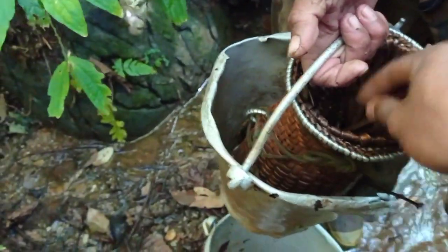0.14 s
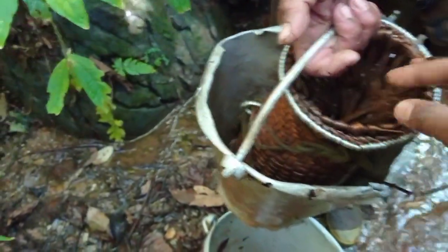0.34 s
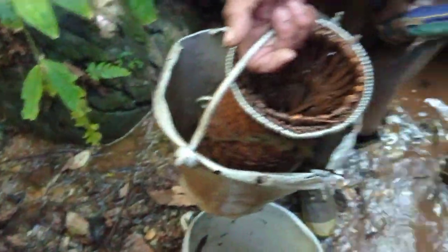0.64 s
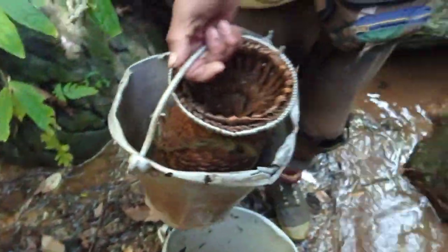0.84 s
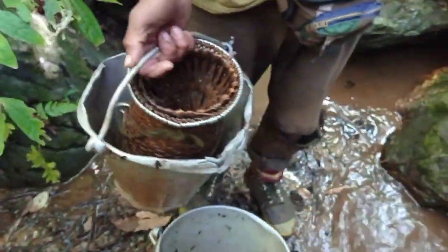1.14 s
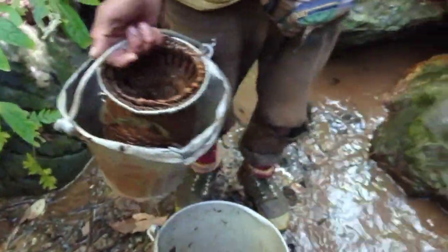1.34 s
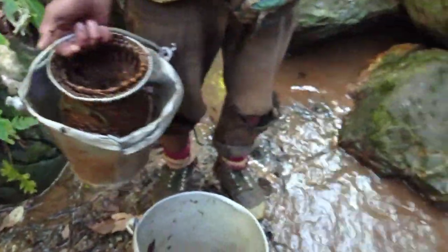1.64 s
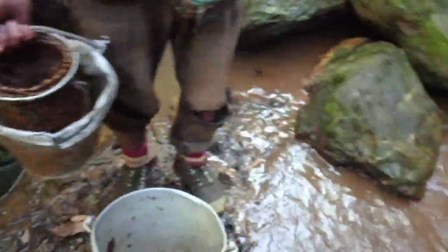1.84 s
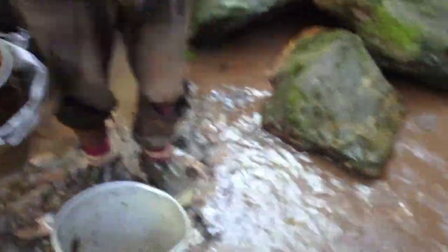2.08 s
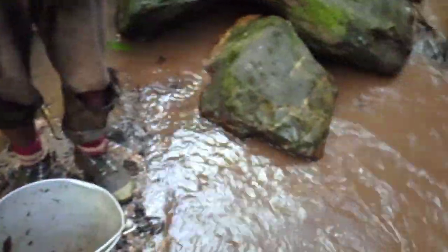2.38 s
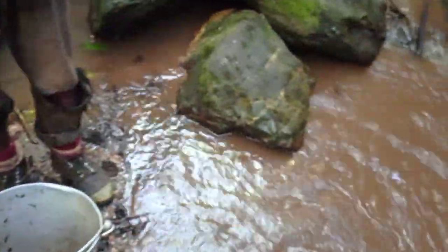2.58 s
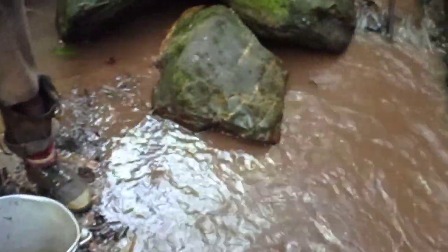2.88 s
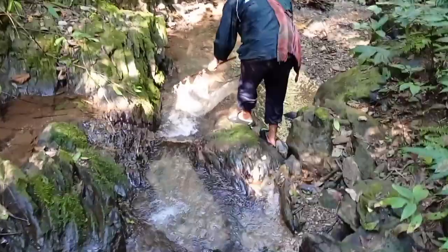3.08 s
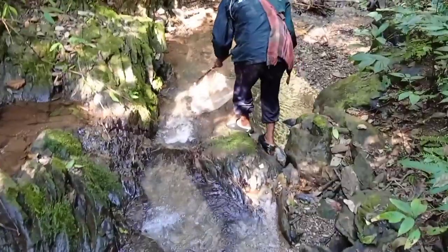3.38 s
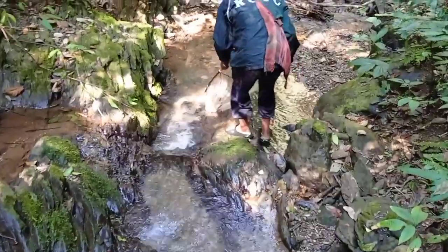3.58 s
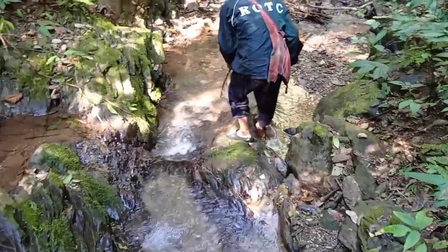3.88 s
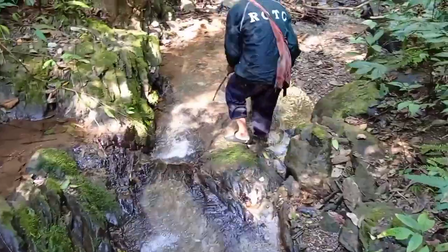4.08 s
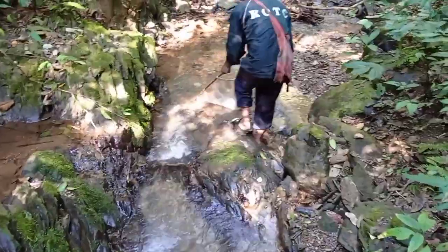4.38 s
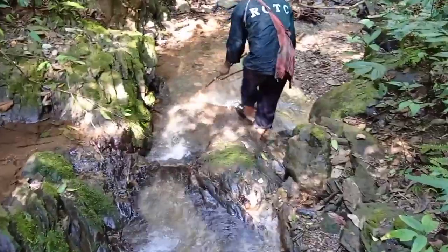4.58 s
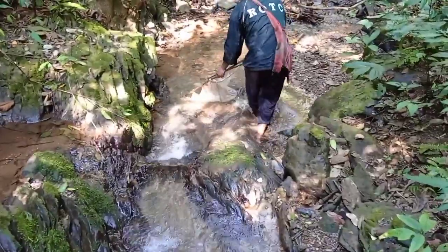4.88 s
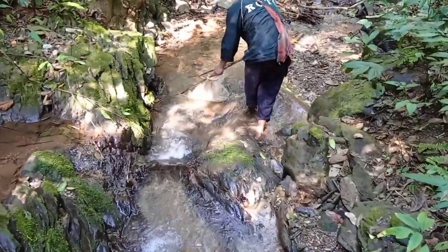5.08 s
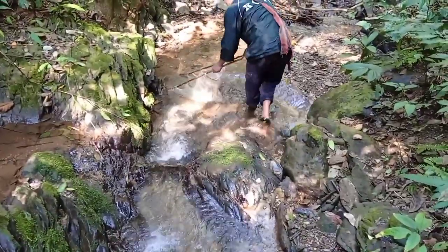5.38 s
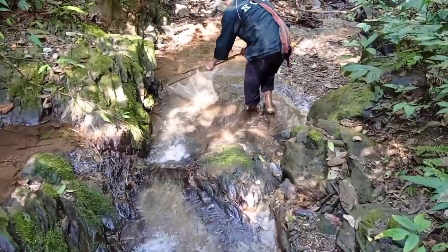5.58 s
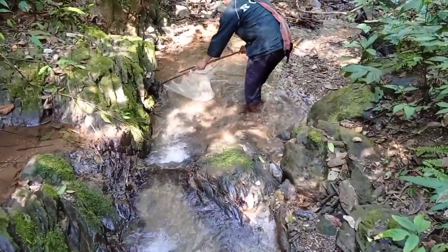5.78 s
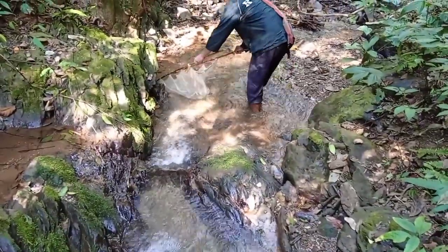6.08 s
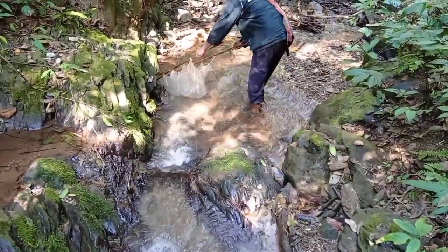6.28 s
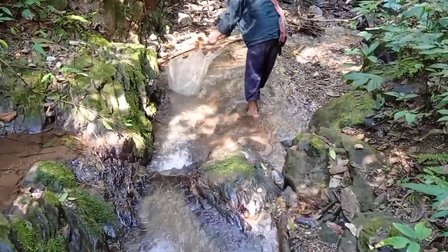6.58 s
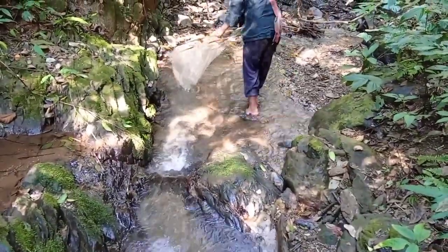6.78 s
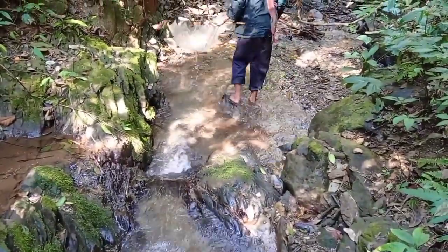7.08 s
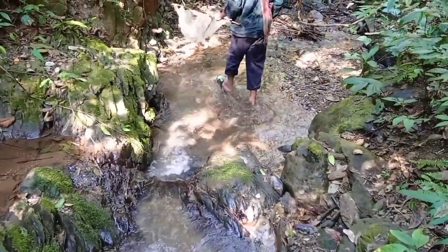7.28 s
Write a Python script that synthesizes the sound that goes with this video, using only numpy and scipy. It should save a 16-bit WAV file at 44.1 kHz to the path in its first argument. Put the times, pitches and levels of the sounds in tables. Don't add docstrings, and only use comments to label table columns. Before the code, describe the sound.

A shallow stream rushes and gurgles over rocks, drops to silence briefly near three seconds, then fades in louder beside a small cascade.

```python
import sys
import numpy as np
from scipy import signal
from scipy.fft import rfft, irfft
from scipy.io import wavfile

SR = 44100
rng = np.random.default_rng(int(sys.argv[2]) if len(sys.argv) > 2 else 0)


def to_linear_factor(level_db):
    exponent = np.asarray(level_db, float) / 20
    return 10 ** exponent


def to_wav(sig):
    pcm = np.clip(np.atleast_2d(sig), -1, 1) * 32767
    pcm = np.round(pcm).astype(np.int16)
    wavfile.write(sys.argv[1], SR, pcm.T)


N = 328104
CUT_S, RESUME_S = 2.9042, 3.0495
DRIP_RISE = 0.21


def rms_one(x):
    return x / np.sqrt(np.mean(x ** 2) + 1e-20)


def in_time(rows):
    s, *columns = np.transpose(rows)
    return [np.interp(np.arange(N) / SR, s, column) for column in columns]


def at_hz(points, hz):
    point_hz, point_db = np.transpose(points)
    return np.interp(np.log(hz), np.log(point_hz), point_db)


def add(out, start_s, sound):
    i = max(round(start_s * SR), 0)
    out[i:i + len(sound)] += sound[:N - i]


def bandpass(low_hz, high_hz, x):
    return signal.sosfilt(signal.butter(2, [low_hz, high_hz], "band", fs=SR, output="sos"), x)


def drift(rate):
    r = np.exp(-80 * np.pi * rate / SR)
    coarse = rng.standard_normal(N // 40 + 2002)
    slow = signal.lfilter([1], [1, -2 * r, r * r], coarse)[2000:]
    return np.interp(np.arange(N) / 40, np.arange(len(slow)), rms_one(slow))


def bubble(hz, cycles, rise):
    u = np.arange(int(2 * cycles * SR / hz)) * hz / (cycles * SR)
    pitch_hz = hz * (1 - rise * np.exp(-3.0 * u))
    swell = u ** 1.86 * np.exp(-4.0 * u)
    return swell / swell.max() * np.sin(2 * np.pi * np.cumsum(pitch_hz) / SR)


def white_water(births_per_cycle, spread_db, cycles, bubble_db, patchy_db, surge_db):
    out, edges_hz = 0, 30 * 2 ** (np.arange(28) / 3)
    surge, white, near = drift(32.0), rng.standard_normal((2, N)), drift(20.0)
    for k, (low_hz, high_hz) in enumerate(zip(edges_hz, edges_hz[1:])):
        hz = np.sqrt(low_hz * high_hz)
        hiss = rms_one(bandpass(low_hz, high_hz, white[k % 2]))
        born = rng.random(N) < births_per_cycle * np.sqrt(hz * 1000) / SR
        sizes = to_linear_factor(spread_db * np.minimum(rng.exponential(1, N), 4)) * born
        bubbles = rms_one(signal.oaconvolve(sizes, bubble(hz * 1.097, cycles, 0.29))[:N])
        if k % 4 == 0:
            near = drift(54.0)
        gain = to_linear_factor(surge_db * surge + patchy_db * (near + .5 * drift(16.0)))
        out = out + np.sqrt(hz) * gain * rms_one(hiss + to_linear_factor(bubble_db) * bubbles)
    return out


def evened(spectrum):
    total, k = np.cumsum(np.abs(spectrum) ** 2), np.arange(len(spectrum))
    low = (k * .96 - 60).clip(0).astype(int)
    high = (k * 1.04 + 60).clip(max=k[-1]).astype(int)
    return spectrum / np.sqrt((total[high] - total[low]) / (high - low) + 1e-9)


def layer_gains(before):
    # start_s, level_db
    flow = [
        [(0, -47.5), (.3, -46.5), (.5, -44.5), (.62, -42), (.76, -42.5), (.9, -47), (1.4, -45), (1.71, -42),
         (2.1, -43), (2.45, -39.5), (2.9, -41.5)],
        [(3.36, -39.5), (3.9, -39), (4.8, -38), (5.3, -39), (5.9, -37.5), (6.6, -39.5), (7.4, -37.5)],
    ]
    # depth_db, changes_per_s
    wander = [(-0.1, 3.6), (1.5, 9.2), (.5, 4.6), (6, 14.0)]
    follows = [0.6, 0.58, 0.74, .9]
    flow_db, = in_time(flow[0] + flow[1])
    usual_db = np.where(before, flow_db[before].mean(), flow_db[~before].mean())
    swing_db = flow_db - usual_db
    return [to_linear_factor(usual_db + share * swing_db + depth_db * drift(rate))
            for (depth_db, rate), share in zip(wander, follows)]


def spot_colours(hz):
    # hz, level_db_per_hz
    bank = [(29, -74), (50, -22), (97, -12.5), (221, -14.5), (307, -4.5), (338, -11), (516, -5.5),
            (567, -10.5), (789, -6.5), (975, -5), (1150, -14), (2230, -12.5), (8530, -24.5), (14000, -48.5)]
    # hz, level_db_per_hz
    pool = [(29, -36.5), (50, -29), (144, -23), (254, -8), (338, -7.5), (417, -7.5), (492, -7), (718, -4.5),
            (1420, -9), (1720, -7.5), (2230, -12.5), (6280, -13), (11900, -31), (14000, -42)]
    # hz, level_db_per_hz
    cascade = [(35, -56), (60, -26.5), (258, 2), (1310, -10.5), (1500, -8.5), (1800, -10), (2650, -6.5),
               (3640, -12.5), (4370, -9.5), (4900, -16.5), (6590, -11.5), (8280, -24), (9940, -23),
               (14000, -41)]
    # hz, gain_db
    mic_lift = [(14000, 0), (14350, 4), (14750, 13), (15780, 13), (15800, -60)]
    # hz, width_hz, gain_db
    hollows = [(278, 9.2, 4.5), (1540, 40, 4), (2630, 140, 2)]
    colours = [to_linear_factor(at_hz(spot, hz) + at_hz(mic_lift, hz)) for spot in (bank, pool, cascade)]
    colours[2] *= to_linear_factor(sum(db / (1 + (2 * (hz - top_hz) / width_hz) ** 2) for top_hz, width_hz, db in hollows))
    return colours


def stream():
    # rush_db, gurgle_db, spray_db, rumble_db
    layers = [(-0.5, -6.5, -3.5, -34), (-1.5, -7, -5.5, -27), (-1.5, -7, -6, -29.5)]
    # start_s, pool_share
    turning = [(1.3, 0), (1.8, 1)]
    water = evened(rfft(white_water(births_per_cycle=.06, spread_db=4.5, cycles=8.4,
                                    bubble_db=-7.5, patchy_db=1.09, surge_db=0.42)))
    hz = np.maximum(np.arange(len(water)) * SR / N, 1)
    lows = [1 / (1 + (hz / split_hz) ** 4) for split_hz in (150, 700, 3500)]
    rumble, gurgle, rush, spray = np.diff([0 * hz, *lows, 1 + 0 * hz], axis=0)
    before, turn = np.arange(N) < CUT_S * SR, in_time(turning)[0]
    heard = before * (1 - turn), before * turn, ~before
    gains = layer_gains(before)
    out = np.zeros(N)
    for colour, levels_db, share in zip(spot_colours(hz), layers, heard):
        for part, level_db, gain in zip((rush, gurgle, spray, rumble), levels_db, gains):
            out += share * gain * to_linear_factor(level_db) * rms_one(irfft(water * colour * part, N))
    return out


def single_bubbles():
    # start_s, peak_db, end_pitch_hz
    gulps = [(0.46, -37, 261), (0.565, -35, 242), (.6, -35, 330), (1.45, -36, 390), (2.072, -35, 340),
             (2.682, -31.5, 274), (2.709, -38.5, 194), (2.786, -34.5, 280), (3.342, -27.5, 305),
             (3.774, -32, 382), (3.88, -35, 265), (4.762, -29, 272), (4.999, -29, 307), (5.277, -28, 272),
             (5.569, -29, 267), (5.639, -32.5, 274), (5.946, -28.5, 315), (6.578, -38, 264),
             (7.11, -31, 263), (7.35, -30, 423)]
    # start_s, peak_db, end_pitch_hz, cycles
    drips = [(.398, -16, 1047, 8.8), (.48, -31, 750, 8.5), (.576, -26, 840, 7), (0.6242, -20.5, 990, 5),
             (.693, -33, 580, 7), (.723, -23, 550, 7.3), (.999, -26, 895, 5.6), (1.07, -31, 820, 9.4),
             (1.663, -34, 693, 6.9), (1.754, -20, 610, 2.3), (1.959, -23, 453, 6.8), (2.129, -31, 900, 11),
             (2.159, -29, 587, 9.9), (2.532, -27, 746, 5.8), (3.299, -33, 953, 12), (3.319, -27, 1090, 21),
             (3.344, -33, 680, 9.1), (4.299, -26.5, 926, 9.6), (4.775, -23.5, 847, 5.1),
             (4.862, -29, 480, 5.1)]
    # start_s, peak_db, end_pitch_hz, cycles
    plinks = [(.368, -30, 1300, 12), (0.5807, -18, 2300, 5.9), (.7544, -32, 1450, 16),
              (.7851, -39, 2400, 8.9), (2.1111, -29.5, 1700, 11), (2.3044, -35, 1690, 7.7),
              (2.3391, -24.5, 1460, 9.2), (2.4365, -31, 1340, 17), (4.7394, -29, 1530, 11),
              (4.7592, -19, 1540, 7.5), (4.79, -32, 2600, 14), (7.1446, -24, 2360, 6.1),
              (7.155, -23, 2710, 12), (7.372, -23, 2720, 10), (7.175, -26, 4200, 12)]
    # start_s, peak_db, end_pitch_hz, cycles, rise_share
    swells = [
        (.3915, -22, 833, 12, 0.34),
        (.566, -36, 4200, 25, 0.24),
        (.584, -34, 1420, 5.8, -.2),
        (.636, -34, 3600, 13, 0.2),
        (2.135, -34.5, 617, 16.2, -.3),
    ]
    gulp_cycles, gulp_rise, plink_rise = 5.1, 0.13, 0.13
    rows = [(*gulp, gulp_cycles, gulp_rise) for gulp in gulps]
    rows += [(*drip, DRIP_RISE) for drip in drips]
    rows += [(*plink, plink_rise) for plink in plinks]
    out = np.zeros(N)
    for s, db, hz, cycles, rise in rows + swells:
        sound = bubble(hz, max(cycles, 2), np.clip(rise, -.3, .6))
        add(out, s - 0.1 * cycles / hz, to_linear_factor(db - 6.0) * sound)
    return out


def froth():
    # start_s, length_s, peak_db, middle_pitch_hz
    stirs = [
        (.47, 0.057, -45, 1220),
        (0.538, 0.092, -50, 1530),
        (0.678, 0.089, -47, 800),
        (1.637, 0.18, -41.5, 920),
        (1.901, .06, -47.5, 1190),
        (2.204, .25, -45, 1095),
        (3.279, .07, -42.5, 1070),
        (4.764, 0.044, -44, 1100),
    ]
    bubbles, octaves, cycles, spread_db = 30, .5, 7.5, 2.5
    out = np.zeros(N)
    for (s, length_s, db, middle_hz), cloud in zip(stirs, rng.uniform(-1.1, 1, (len(stirs), bubbles, 3))):
        for when, size, tune in cloud:
            sound = bubble(middle_hz * 2 ** (octaves * tune), cycles, DRIP_RISE)
            add(out, s + length_s * (when + 1) / 2, to_linear_factor(db + spread_db * size) * sound)
    return out


def slaps():
    # start_s, rms_db, decay_ms, upper_edge_hz
    hits = [(.562, -39, 9.1, 5000), (.580, -30, 5.1, 3200), (2.384, -41, 2.7, 9000),
            (2.3924, -28, 1.7, 9000), (2.421, -23, 1.6, 5000), (2.424, -39, 1.2, 8000),
            (4.759, -33, 6, 2180), (4.788, -31.5, 11, 4000), (6.179, -26, 1.5, 7500),
            (6.217, -34, 2, 11000), (4.15, -31, 6, 6000)]
    out, ms = np.zeros(N), np.arange(2000) * 1000 / SR
    for (s, db, decay_ms, top_hz), noise in zip(hits, rng.standard_normal((len(hits), 2000))):
        burst = rms_one(bandpass(700, top_hz, noise))
        add(out, s, to_linear_factor(db) * burst * (1 - np.exp(-ms / 0.36)) * np.exp(-ms / decay_ms))
    return out


def patter():
    # centre_hz, peak_db
    sizes = [(4150, -33), (6400, -38), (9500, -42)]
    count, spread_db, detune = 40, 2.5, .07
    drops = []
    for k, (when, size, tune) in enumerate(rng.uniform(-1, 1, (count, 3))):
        hz, db = sizes[k % 3]
        start_s = RESUME_S + (N / SR - RESUME_S) * (when + 1) / 2
        drops.append((start_s, db + spread_db * size, hz * (1 + detune * tune)))
    return drops


def ticks():
    # start_s, peak_db, centre_hz
    droplets = [(.381, -35, 4730), (.568, -35, 3860), (.6125, -37, 6300), (2.2228, -28.5, 5550),
                (2.393, -23.5, 6400), (2.4365, -27, 3780), (2.6552, -25.5, 7100), (3.3438, -29, 4100),
                (3.4301, -30, 4260), (3.491, -26, 7300), (3.5227, -30, 3870), (3.6077, -31, 6680),
                (3.8317, -30, 6160), (4.3196, -26, 4500), (4.3655, -25.5, 7700), (4.7598, -29, 6560),
                (4.9092, -29, 6700), (5.3116, -30, 6460), (5.3587, -34, 3870), (5.4101, -27, 3760),
                (5.7194, -32, 4670), (5.7394, -27, 4400), (6.1785, -26, 4150), (6.2148, -29, 4600),
                (6.4308, -25, 6900), (6.5705, -30, 4530), (6.777, -31, 7040), (7.3801, -26, 6300)]
    # start_s, peak_db, centre_hz
    specks = [(.5676, -45, 8520), (.7254, -41, 8730), (2.386, -35, 8580), (2.6539, -41, 8780),
              (3.2884, -32, 9090), (3.3438, -33, 9690), (3.4795, -38, 14800), (3.491, -37, 10000),
              (3.9305, -38, 10300), (4.2178, -34, 9700), (4.3655, -31, 9720), (4.6487, -35, 10300),
              (4.9815, -35, 9310), (5.7378, -35, 10200), (5.879, -38, 9700), (6.1624, -34, 10600),
              (6.2153, -38, 9900), (6.577, -36, 10100), (6.9364, -35, 9990), (7.3756, -37.5, 10000)]
    snap_db, snap_s = -9.0, .0016
    out, t = np.zeros(N), np.arange(200) / SR
    drops = droplets + specks + patter()
    for (s, db, hz), noise in zip(drops, rng.standard_normal((len(drops), 200))):
        ring = np.sin(2 * np.pi * hz * t) * np.exp(-t * hz / 11.3) * (1 - np.exp(-t * hz / 0.47))
        snap = bandpass(hz / 1.8, min(hz * 1.11, 15700), noise) * np.exp(-t / snap_s)
        add(out, s, to_linear_factor(db - 2.0) * (ring + to_linear_factor(snap_db + 10.5) * snap))
    return out


def pocket():
    # start_s, pitch_hz, level_db
    course = [
        (4.062, 147, -77),
        (4.074, 120, -32),
        (4.085, 84, -50),
        (4.11, 66, -44),
        (4.16, 66, -58),
        (4.195, 90, -46),
        (4.22, 146, -47),
        (4.24, 170, -60),
    ]
    hz, db = in_time(course)
    return to_linear_factor(db) * (db > -69.9) * np.sqrt(2) * np.sin(2 * np.pi * np.cumsum(hz) / SR)


def scene():
    water = stream() + single_bubbles() + froth() + slaps() + ticks() + pocket()
    return signal.sosfilt(signal.butter(2, 45, "high", fs=SR, output="sos"), water)[None]


def roll_off(x):
    return signal.sosfilt(signal.butter(12, 16930, fs=SR, output="sos"), x)


def record(dry):
    fade_s, fade_from_db, fade_curve = 0.25, -26, 1.19
    t = np.arange(N) / SR
    risen = np.clip((t - RESUME_S) / fade_s, 0, 1) ** fade_curve
    fade_in = (t > RESUME_S) * (risen + (1 - risen) * to_linear_factor(fade_from_db))
    gain = np.where(t < CUT_S, 1, fade_in)
    top_cut = signal.ellip(12, .5, 80, 15760, fs=SR, output="sos")
    return roll_off(signal.sosfilt(top_cut, dry * gain))


dry = scene()
out = record(dry)
to_wav(out)
```